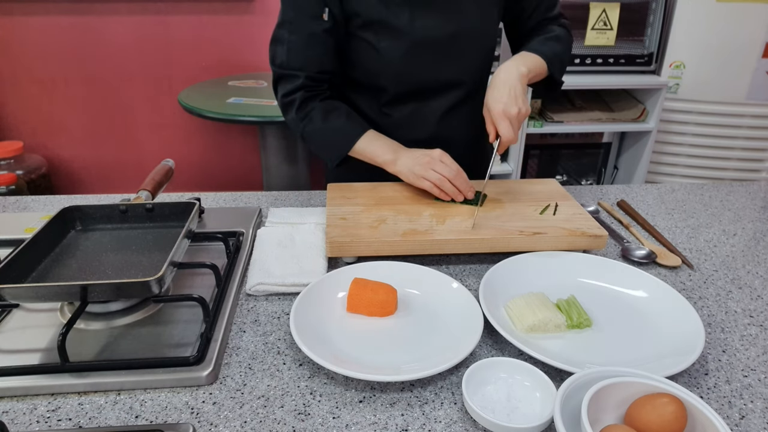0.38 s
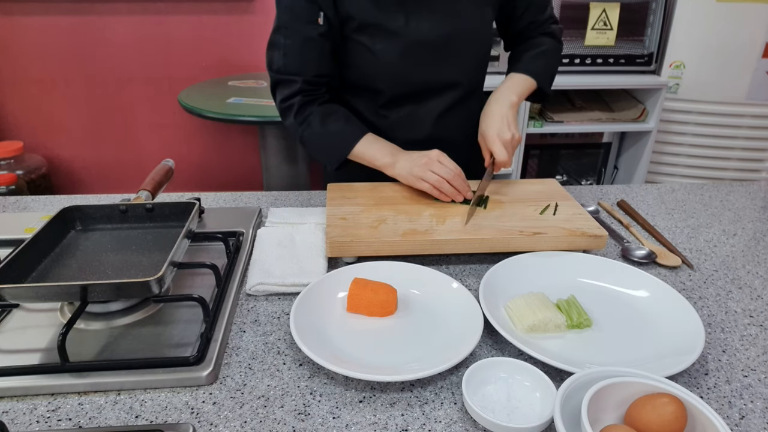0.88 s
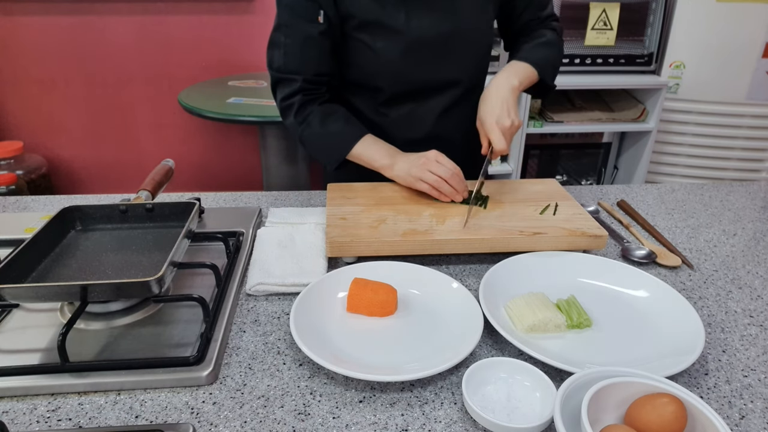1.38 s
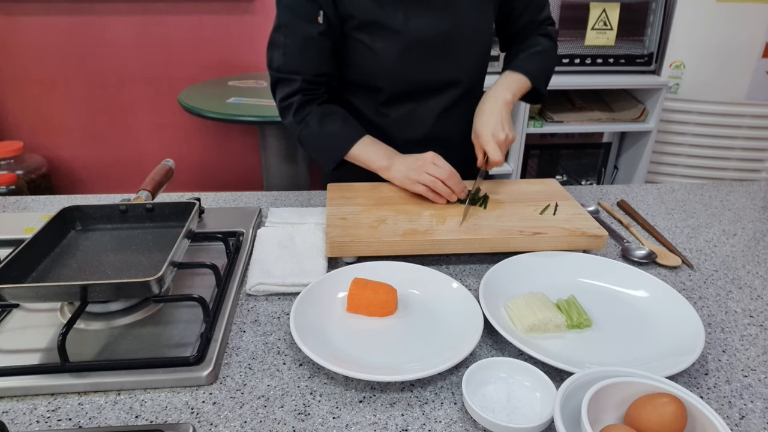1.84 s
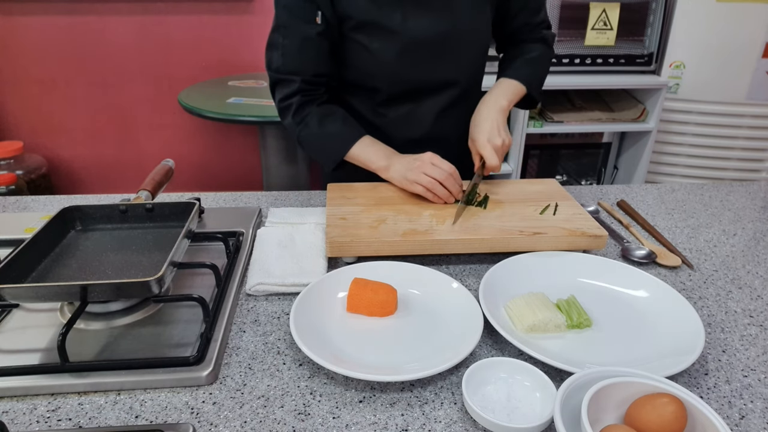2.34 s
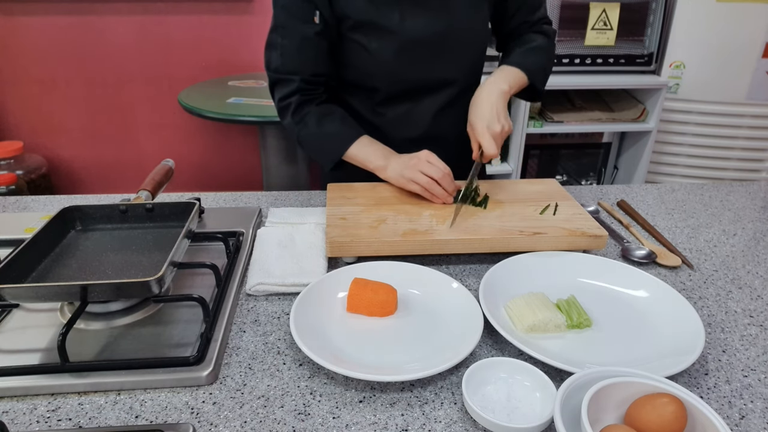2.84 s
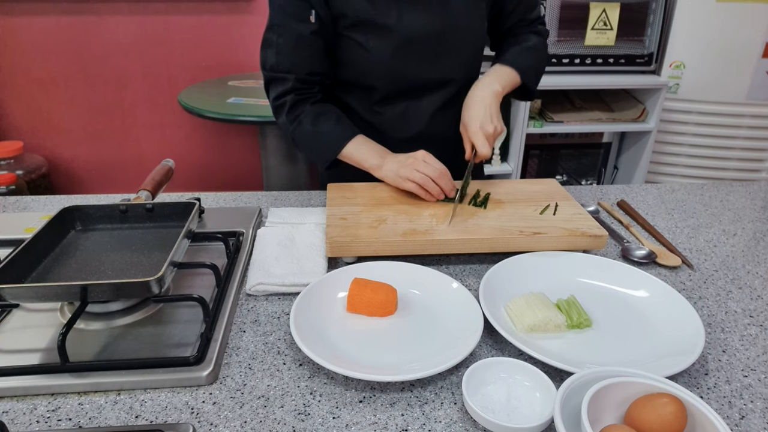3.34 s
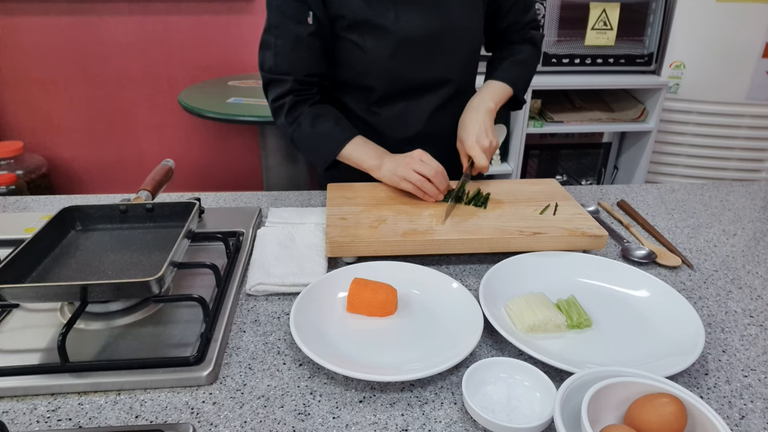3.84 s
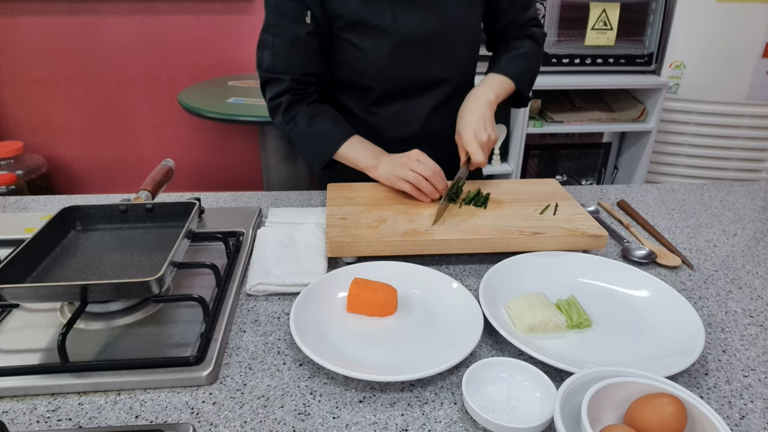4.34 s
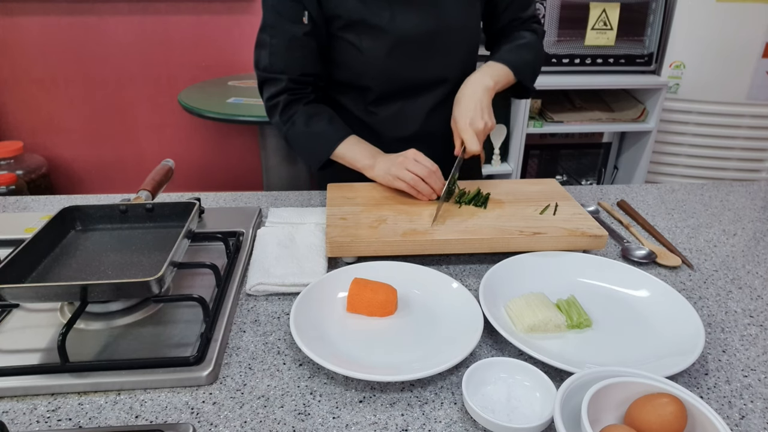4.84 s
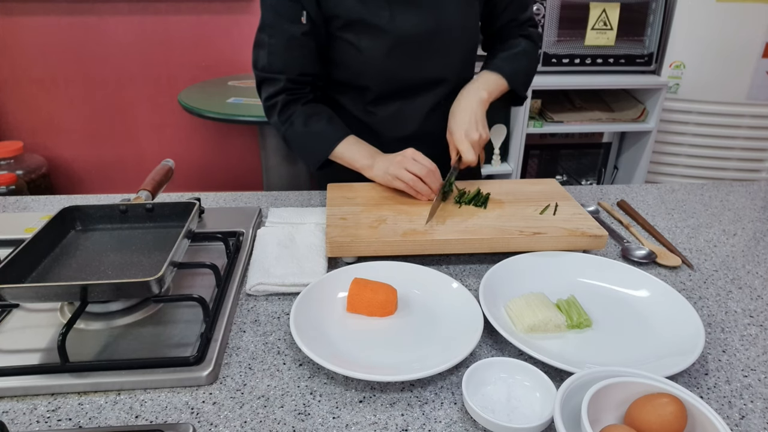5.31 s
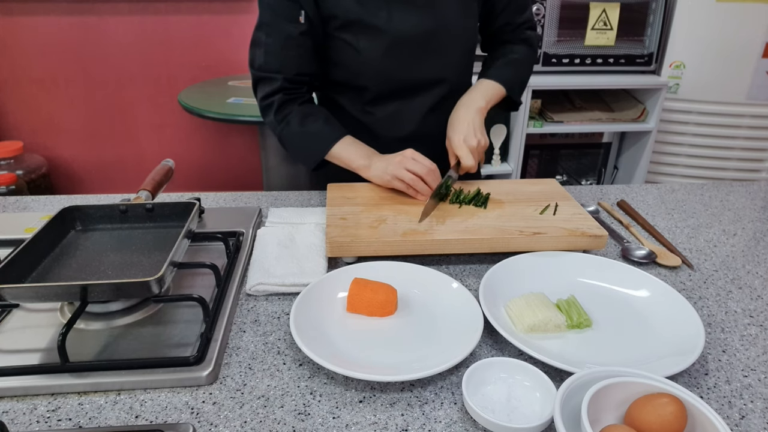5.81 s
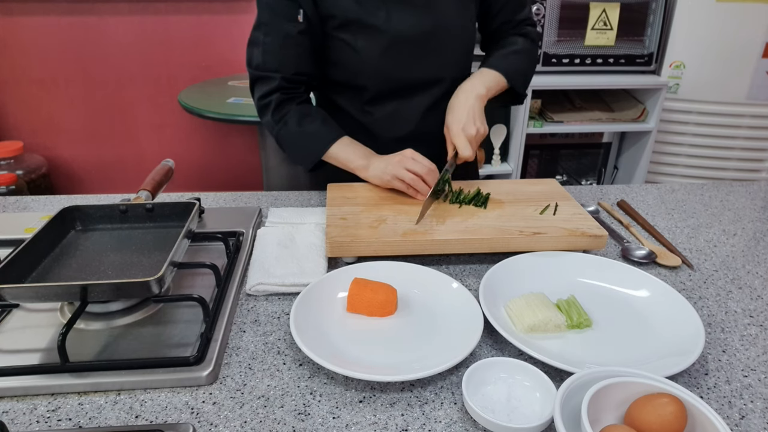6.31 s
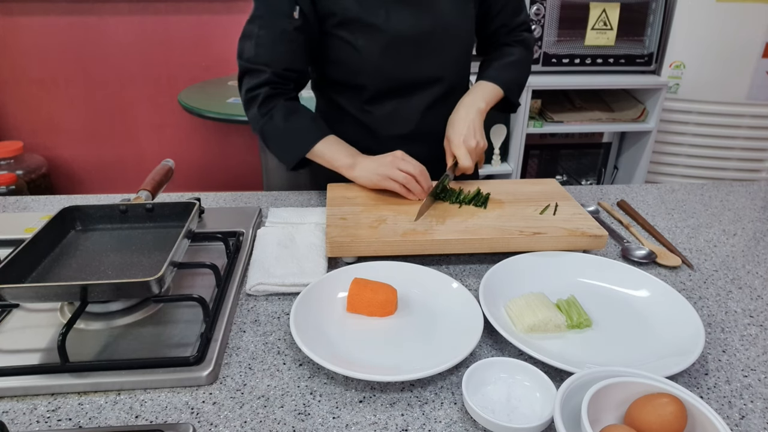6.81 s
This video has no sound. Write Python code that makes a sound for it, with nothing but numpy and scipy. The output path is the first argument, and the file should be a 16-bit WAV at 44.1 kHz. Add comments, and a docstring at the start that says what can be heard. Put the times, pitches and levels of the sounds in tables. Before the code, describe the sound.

Quick steady chopping of crisp peel: short wet crunches, some ending in woody knocks, others barely tapping, in a small room with soft rumble.

```python
"""A kitchen knife slices thin strips of cucumber peel on a wooden board that lies on a stone counter.
Crunch: dense random clicks. Tap: a short push that rings board and counter modes.
Blade: friction noise in narrow resonances as it slides into place before a cut and out after it.
Room: four dull echoes and a banded noise tail. Background: ventilation rumble, two hum lines, faint hiss."""
import sys
import numpy as np
from scipy import signal
from scipy.fft import rfft, irfft
from scipy.io import wavfile

SR = 44100
rng = np.random.default_rng(int(sys.argv[2]) if len(sys.argv) > 2 else 0)


def dump(signal):
    """Clip the signal to [-1, 1] and save it as 16-bit WAV at the path in sys.argv[1]."""
    limited = np.clip(np.atleast_2d(signal).T, -1, 1)
    pcm = np.round(limited * 32767).astype(np.int16)
    wavfile.write(sys.argv[1], SR, pcm)


def nominal_scale(level):
    """Amplitude ratio for a level in decibels (scalar or array-like)."""
    x = np.asarray(level, float) / 20
    return 10 ** x


N = 316638
EARLIER = SR // 4   # samples computed ahead of the start


def rms_one(x):
    """Scales to unit rms."""
    return x / np.sqrt(np.mean(x ** 2) + 1e-30)


def at_hz(points, hz, column=1):
    """Reads a table column, interpolated over log frequency."""
    points = np.array(points)
    return np.interp(np.log(hz), np.log(points[:, 0]), points[:, column])


def drift(rate_hz):
    """Slow random wander with spread near 1: noise through two equal poles, run at SR / 40."""
    r = np.exp(-80 * np.pi * rate_hz / SR)
    noise = rng.standard_normal(N // 40 + 2002)
    slow = signal.lfilter([1], [1, -2 * r, r * r], noise)[2000:]
    return np.interp(np.arange(N) / 40, np.arange(len(slow)), rms_one(slow))


# edge bursting through the peel; levels relative
# columns: start_s, length_ms, level_db, slide_sing_db (slide into place before it)
CRUNCHES = [(0.603, 58.5, -48, -92), (0.879, 50.5, -53, -86), (1.109, 33, -46, -91),
            (1.315, 36.2, -48.5, -94), (1.535, 33.6, -53.5, -85), (1.742, 33, -48.5, -85),
            (1.953, 30, -46, -86), (2.166, 19.5, -55, -95), (2.376, 19.3, -38.5, -101.5),
            (2.59, 31.6, -44, -95), (2.795, 41, -50.5, -94), (3.019, 29.5, -47.5, -74),
            (3.241, 26, -53, -79.5), (3.466, 37, -49.5, -75), (3.691, 32, -45.5, -71),
            (3.905, 40.8, -47.5, -70.5), (4.123, 32.4, -46, -82), (4.334, 29.5, -42, -84.5),
            (4.556, 17, -46.5, -83), (4.765, 33, -49.5, -82), (4.979, 41, -52.5, -79.5),
            (5.197, 43, -52, -79.5), (5.42, 34, -49.5, -86), (5.636, 30, -43.5, -82.5),
            (5.833, 34.6, -52.5, -79), (6.04, 40.5, -52.5, -79.5), (6.26, 33, -54.5, -85),
            (6.473, 26.7, -49.5, -82.5)]
SWELL_PAST_TAP_MS, LEAST_FADE_MS = 3.6, 4   # swells until just after the listed tap time
WET_DB, WET_DB_PER_TAP_DB = -42, 0.37   # wet low crunch at a 0 dB tap; slope


def crunch_force(clicks_per_s, spread_db, smooth_share, touch_ms):
    """Cells burst as dense uneven clicks: faint first touch, swell while the edge goes through, quick fade."""
    shape, wet_db = np.zeros(N), np.zeros(N)
    for (start_s, length_ms, level_db, _), (tap_s, tap_db, _) in zip(CRUNCHES, TAP_LANDINGS):
        swell_ms = np.clip(1000 * (tap_s - start_s) + SWELL_PAST_TAP_MS, 4, length_ms - LEAST_FADE_MS)
        fade_ms = length_ms - swell_ms
        ms = np.arange(-touch_ms, swell_ms + 2 * fade_ms + 8, 1000 / SR)
        knots_ms = [ms[0], -1, 1.5, swell_ms, swell_ms + fade_ms, ms[-1]]
        contour_db = np.interp(ms, knots_ms, [-49.5, -29.0, -15.0, -4.5, -15.0, -43.5])
        first = round((start_s - touch_ms / 1000) * SR)
        shape[first:first + len(ms)] = nominal_scale(level_db + contour_db)
        wet_db[first:first + len(ms)] = WET_DB + WET_DB_PER_TAP_DB * tap_db - level_db
    sizes = nominal_scale(spread_db * np.minimum(rng.exponential(1, N), 5)) * rng.choice([-1, 1], N)
    clicks = rms_one(sizes * (rng.random(N) < clicks_per_s / SR))
    grain = clicks + smooth_share * rng.standard_normal(N)
    return shape * nominal_scale(4.5 * drift(140)) * grain, wet_db


# crunch colour; columns: frequency_hz, relative_db_per_hz
PEEL_COLOUR = [(120, -39), (200, 9.5), (1500, -1.5), (1770, -8.5), (2020, -1.5), (3130, -4.5), (3560, -5.5),
               (5330, -7.5), (9580, -10.5), (12200, -17), (16000, -23.5)]


def peel(force, wet_db, side_db, wet_below_hz):
    """The bursts heard directly, spread along the cut so that the treble differs between the ears."""
    hz = np.maximum(np.fft.rfftfreq(N, 1 / SR), 10)
    low_share = np.clip(np.log2(wet_below_hz / hz), 0, 1)   # full an octave below wet_below_hz
    pair = np.array([force, force * rng.choice([-1, 1], N)])
    mixed = low_share * rfft(pair * nominal_scale(wet_db)) + (1 - low_share) * rfft(pair)
    mid, side = nominal_scale(at_hz(PEEL_COLOUR, hz)) * mixed
    treble_side = nominal_scale(side_db) * np.minimum(hz / 6000, 1) * side
    return irfft(mid + treble_side * [[1], [-1]], N)


# edge meeting the board, one per crunch and a last light touch
# columns: time_s (before lag_ms), push_area_db, contact_ms (two sigma of the push)
TAP_LANDINGS = [(0.63, -33.5, 0.05), (0.889, -57, 0.079), (1.139, -8, 0.12), (1.337, -46.5, 0.05),
                (1.548, -45, 0.055), (1.756, -14, 0.29), (1.981, -6.5, 0.12), (2.177, -18, 0.36),
                (2.391, -9, 0.13), (2.613, -7, 0.12), (2.811, -37.5, 0.45), (3.034, -13, 0.15),
                (3.26, -19, 0.45), (3.474, -44, 0.05), (3.703, -32, 0.25), (3.92, -36.5, 0.16),
                (4.137, -11, 0.18), (4.344, -23, 0.4), (4.563, -17.5, 0.45), (4.773, -31.5, 0.31),
                (4.991, -46.5, 0.15), (5.203, -40.5, 0.092), (5.43, -40, 0.15), (5.64, -43, 0.15),
                (5.844, -47.5, 0.15), (6.053, -44, 0.15), (6.268, -45, 0.15), (6.489, -38, 0.15),
                (6.834, -60, 0.04)]
# landing just before the start; columns: push_area_db, contact_ms
EARLIER_LANDING = (-31, .4)
EARLIER_LANDING_S = -.06   # before lag_ms
PUSH_DB, PUSH_DB_PER_TAP_DB = -40.5, 0.44   # push into the counter at a 0 dB tap; slope


def tap_force(lag_ms):
    """Each landing is a smooth bell-shaped push of set area; a longer contact is duller."""
    blow, push, around = np.zeros(N + EARLIER), np.zeros(N + EARLIER), np.arange(-60, 61)
    for time_s, area_db, contact_ms in [(EARLIER_LANDING_S, *EARLIER_LANDING)] + TAP_LANDINGS:
        at = (time_s + lag_ms / 1000) * SR + EARLIER
        sigma = contact_ms * SR / 2000   # samples
        bell = np.exp(-.5 * ((around - at % 1) / sigma) ** 2)
        blow[int(at) + around] += nominal_scale(area_db) * bell / bell.sum()
        push[int(at)] += nominal_scale(PUSH_DB + PUSH_DB_PER_TAP_DB * area_db)
    return blow, push


def ring(force, modes, spot_db):
    """Force drives decaying modes; each mode's height wanders with the spot that is struck."""
    out, steps = 0, np.arange(0, len(force) + SR, SR // 5)
    for hz, level_db, t60_s, polarity in modes:
        r, w = nominal_scale(-60 / (t60_s * SR)), 2 * np.pi * hz / SR
        wander = np.interp(np.arange(len(force)), steps, rng.standard_normal(len(steps)))
        drive = nominal_scale(spot_db * wander) * force + 1e-18
        tone = signal.lfilter([0, np.sin(w)], [1, -2 * r * np.cos(w), r * r], drive)
        out = out + polarity * nominal_scale(level_db) * tone
    return out


# board on its counter; columns: frequency_hz, level_db, t60_s, first_swing_sign
BOARD_MODES = [(594, -14, .008, 1), (711, -10, .032, 1), (1075, -8, .01, -1), (1410, -13, .007, 1),
               (1584, -23, .06, 1), (1969, -.5, .013, -1), (2389, -15, .022, 1), (4026, -20, .03, -1),
               (245, -21, .05, -1), (364, -34, .08, 1), (465, -34, .08, -1), (615, -35, .18, 1),
               (684, -31, .2, -1), (864, -32, .07, 1), (532, -35, .1, -1), (185, -28, .08, 1),
               (985, -28, .1, -1), (1240, -28, .1, -1), (2940, -30, .06, -1), (3500, -30, .06, -1)]


def board_ring(blow, wet_bursts):
    """Taps and, faintly, the wet crunch set the board's modes ringing."""
    return ring(blow + nominal_scale(-44.5) * np.pad(wet_bursts, (EARLIER, 0)), BOARD_MODES, spot_db=1.5)


def tick(blow):
    """Steel on wood, heard directly: the push band-passed at 2.5-9 kHz."""
    band = signal.butter(2, [2500, 9000], "band", fs=SR, output="sos")
    return nominal_scale(-19.5) * signal.sosfilt(band, blow)


# counter thud; columns: frequency_hz, level_db, t60_s, signed_gain
COUNTER_MODES = [(62.33, -1.5, 0.27, 0.95), (116.5, 1.5, 0.095, -1.1)]


def counter_thud(push):
    """Each landing excites two low modes of the counter."""
    return ring(nominal_scale(4.0) * push, COUNTER_MODES, spot_db=0.5)


# lining the blade up around the first cut; levels relative
# columns: middle_s, length_ms, sing_db, hiss_db
LINING_UP_SLIDES = [(0.285, 135, -98, -79.5), (0.358, 120, -81, -77), (0.499, 150, -92, -78),
                    (0.733, 72, -79, -73)]
SET_BEFORE_MS, SET_MS = 61, 80   # into place: middle before the crunch, length
LIFT_AFTER_MS, LIFT_MS = 75, 55   # out of the cut: middle after the tap, length
SET_HISS_DB, LIFT_SING_DB, LIFT_HISS_DB = -83.5, -84.5, -87.5   # relative means
SLIDE_SPREAD_DB = 3


def slides():
    """Slide rows: into place before each cut but the first, out of each but the first and last."""
    chance_db = SLIDE_SPREAD_DB * rng.standard_normal((len(CRUNCHES), 3))
    into, out = [], []
    for (start_s, _, _, sing_db), (tap_s, _, _), c in zip(CRUNCHES, TAP_LANDINGS, chance_db):
        into.append((start_s - SET_BEFORE_MS / 1000, SET_MS, sing_db, SET_HISS_DB + c[0]))
        out.append((tap_s + LIFT_AFTER_MS / 1000, LIFT_MS, LIFT_SING_DB + c[1], LIFT_HISS_DB + c[2]))
    return LINING_UP_SLIDES + into[1:] + out[1:-1]


# blade, lightly damped by the hand; columns: frequency_hz, width_hz, level_db
BLADE_MODES = [(650, 80, -9), (1300, 110, -10), (1990, 70, -6), (3030, 70, 2), (3700, 60, -12),
               (4150, 70, -18), (5210, 120, -11), (5750, 100, -16), (6510, 100, -14), (7150, 100, -16),
               (7900, 130, -16)]


def blade(bursts, hiss_db):
    """Friction noise sings in the blade's resonances under a broad hiss; the crunch shakes the blade too."""
    sing, hiss = np.zeros(N), np.zeros(N)
    for middle_s, length_ms, sing_db, rub_db in slides():
        n = round(length_ms * SR / 1000)
        first = round(middle_s * SR) - n // 2
        sing[first:][:n] += nominal_scale(sing_db) * np.hanning(n)
        hiss[first:][:n] += nominal_scale(rub_db) * np.hanning(n)
    rub = rng.standard_normal((2, N)) * nominal_scale(2.0 * drift(60))
    hiss_band = signal.butter(2, [1500, 8500], "band", fs=SR, output="sos")
    out = nominal_scale(hiss_db) * hiss * signal.sosfilt(hiss_band, rub[1])
    for hz, width_hz, level_db in BLADE_MODES:
        if 2500 < hz < 4500:   # middle modes sing
            drive = rub[0] * sing + nominal_scale(-11) * bursts
        else:   # the others follow the hiss
            drive = rub[0] * 1.3 * hiss * nominal_scale(3.7 * drift(8)) + nominal_scale(2.5 * drift(5.1)) * bursts
        r = np.exp(-np.pi * width_hz / SR)
        tone = signal.lfilter([1, 0, -1], [1, -2 * r * np.cos(2 * np.pi * hz / SR), r * r], drive)
        out += nominal_scale(level_db) * np.sqrt((1 - r * r) / 2) * tone
    return out


def knock(blow):
    """Summed over all directions the board's modes blur into one broad, dull knock."""
    band = signal.butter(5, [300, 2450], "band", fs=SR, output="sos")
    return nominal_scale(25) * signal.sosfilt(band, blow)


BANDS_HZ = 22 * 2 ** np.arange(0, 9.7, .5)   # half-octave edges


def bands(x):
    """Half-octave slices (Hz, sound); neighbours come from x[0] and x[1] in turn."""
    for k, (low, high) in enumerate(zip(BANDS_HZ, BANDS_HZ[1:])):
        band = signal.butter(2, [low, high], "band", fs=SR, output="sos")
        yield np.sqrt(low * high), signal.sosfilt(band, x[k % 2])


# diffuse sound; columns: frequency_hz, left_right_correlation
LEFT_RIGHT_LIKENESS = [(60, 0.91), (180, 0.96), (550, 0.49), (1650, 0.04), (4970, 0.02), (15000, -0.05)]


def diffuse(hz, pair):
    """Left and right from two unrelated sounds, alike in the bass."""
    alike = np.clip(at_hz(LEFT_RIGHT_LIKENESS, hz), -1, 1)
    return np.sqrt(1 + alike) * pair[0] + np.sqrt(1 - alike) * pair[1] * [[1], [-1]]


# nearest surfaces; columns: delay_ms (right), level_db, lowpass_hz, left_lead_samples
WALL_ECHOES = [(7.9, -4, 1200, 0), (19.1, -10, 1200, -1), (24.6, -11, 1000, 1), (13.5, -16, 1800, 3)]
# reverberation; columns: frequency_hz, relative_db, early_t60_s
ROOM_TAIL = [(99.7, -47, 0.33), (242, -33.5, 0.53), (435, -41.5, 0.25), (700, -23.5, 0.2),
             (1350, -34, 0.13), (2250, -36, 0.096), (3393, -37, 0.18), (6008, -35, 0.084),
             (12000, -35.5, 0.09)]


def room(toward_walls, all_around, tail_start_ms, late_db, late_t60_s):
    """A few dull echoes, then noise dying band by band as a sum of an early and a late decay."""
    t = np.arange(SR) / SR
    echoes, tail = np.zeros((2, 2, len(t)))
    for delay_ms, level_db, lowpass_hz, lead in WALL_ECHOES:
        click = np.zeros((2, len(t)))
        delay = delay_ms * SR / 1000
        click[[0, 1], [round(delay - lead), round(delay)]] = nominal_scale(level_db)
        echoes += signal.sosfilt(signal.butter(2, lowpass_hz, fs=SR, output="sos"), click)
    build = np.clip(t * 1000 / tail_start_ms, 0, 1) ** 2
    for hz, pair in bands(rng.standard_normal((2, 2, len(t)))):
        early = nominal_scale(-60 * t / at_hz(ROOM_TAIL, hz, column=2))
        late = nominal_scale(late_db - 60 * t / late_t60_s)
        tail += diffuse(hz, pair) * build * nominal_scale(at_hz(ROOM_TAIL, hz)) * (early + late)
    wet = signal.fftconvolve(toward_walls[None], echoes, axes=1)
    wet = wet + signal.fftconvolve(all_around[None], tail, axes=1)
    return wet[:, EARLIER:EARLIER + N]


# rumble colour; columns: frequency_hz, relative_db_per_hz
RUMBLE_COLOUR = [(25, -38), (45, -12.5), (97, -8), (145, -25.5), (206, -24.5), (300, -29), (430, -31),
                 (1100, -47), (2500, -48), (4000, -52.5), (16000, -63)]
# rumble loudness; columns: time_s, level_db
RUMBLE_LEVEL = [(0.0, -65.5), (0.4, -67), (1.2, -66.5), (2.2, -65), (2.9, -65.5), (4.3, -62), (4.7, -61),
                (5.58, -62.5), (6.5, -63), (7.18, -66.5)]
# hum lines; columns: frequency_hz, amplitude_db (middle of its waver)
HUM_LINES = [(64.6, -79), (96.9, -75.5)]


def ventilation(patchy_db, hum_waver_db):
    """Banded noise rumble, lumpy in the bass and smoother above, with two wavering hum lines."""
    out = 0
    for hz, pair in bands(rng.standard_normal((2, 2, N))):
        lumps_db = patchy_db * min(300 / hz, 1) * np.tanh(drift(1.6))
        out = out + nominal_scale(at_hz(RUMBLE_COLOUR, hz) + lumps_db) * diffuse(hz, pair)
    t = np.arange(N) / SR
    hum = 0
    for hz, level_db in HUM_LINES:
        hum = hum + nominal_scale(level_db + hum_waver_db * drift(1.9)) * np.sin(2 * np.pi * hz * t + drift(2.5))
    return rms_one(out) * nominal_scale(np.interp(t, *np.transpose(RUMBLE_LEVEL))) + hum


# faint distant hiss; columns: time_s, level_db
HISS_LEVEL = [(0, -104), (0.602, -100), (3, -94), (6.5, -81), (6.9, -86), (7.18, -84)]
# hiss passband; columns: low_hz, high_hz
HISS_BAND_HZ = [1600, 2500]


def far_hiss():
    """A band of smooth noise, unrelated in the two ears."""
    band = signal.butter(2, HISS_BAND_HZ, "band", fs=SR, output="sos")
    level_db = np.interp(np.arange(N) / SR, *np.transpose(HISS_LEVEL))
    return nominal_scale(level_db) * rms_one(signal.sosfilt(band, rng.standard_normal((2, N))))


LEFT_LAG_SAMPLES = 2.7   # board reaches the left channel later


def scene():
    """Crunch and tap both drive the board; board, crunch and blade reach the room."""
    bursts, wet_db = crunch_force(clicks_per_s=4000, spread_db=4, smooth_share=.4, touch_ms=12)
    wet_bursts = bursts * nominal_scale(wet_db)
    blow, push = tap_force(lag_ms=.9)
    crunch = nominal_scale(12) * peel(bursts, wet_db, side_db=0.0, wet_below_hz=4000)
    board = board_ring(blow, wet_bursts)
    knife = blade(nominal_scale(2) * wet_bursts, hiss_db=-12.5)
    sample = np.arange(len(board))
    board_left = np.interp(sample - LEFT_LAG_SAMPLES, sample, board)
    struck = np.array([board_left, board]) + counter_thud(push) + tick(blow)
    near = struck[:, EARLIER:] + crunch + knife
    cutting = np.pad(crunch.mean(axis=0) + knife, (EARLIER, 0))
    all_around = nominal_scale(-3.5) * board + knock(blow) + cutting
    walls = room(board + cutting, all_around, tail_start_ms=2.8, late_db=-20, late_t60_s=.55)
    return near + walls + ventilation(patchy_db=4.5, hum_waver_db=2) + far_hiss()


def band_limit(x):
    """A steep low-pass at the top of the band."""
    return signal.sosfilt(signal.butter(12, 16380, fs=SR, output="sos"), x)


def record(dry):
    """The microphone dips near 9.6 kHz and is cut steeply toward 16.1 kHz."""
    dip_hz, width_hz, depth, stop_hz = 9600, 2500, .7, 16100
    band = signal.lfilter(*signal.iirpeak(dip_hz, dip_hz / width_hz, fs=SR), dry)
    lowpass = signal.cheby2(12, 60, stop_hz, fs=SR, output="sos")
    heard = signal.sosfilt(lowpass, dry - depth * band)
    return band_limit(heard)


dry = scene()
out = record(dry)
dump(out)
```